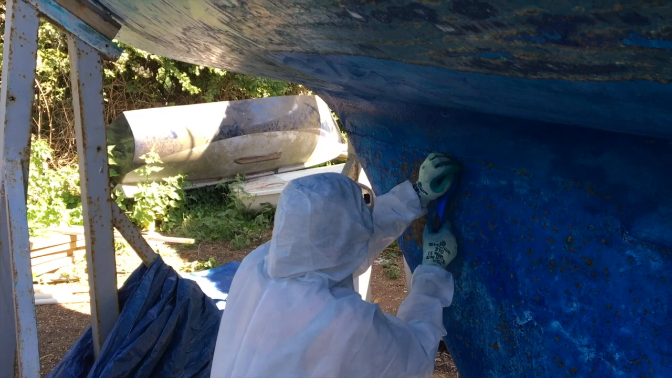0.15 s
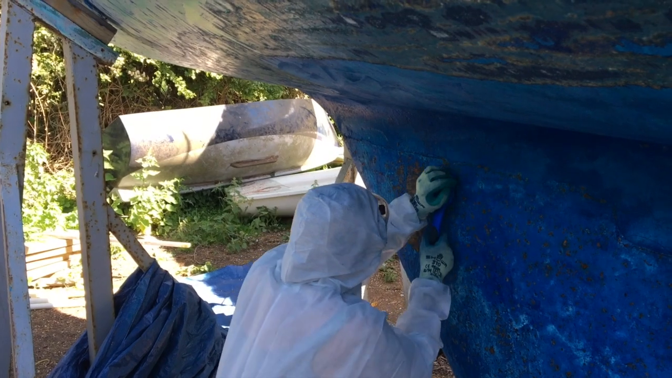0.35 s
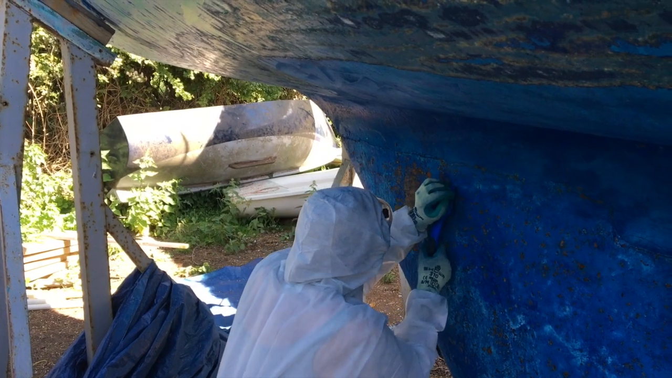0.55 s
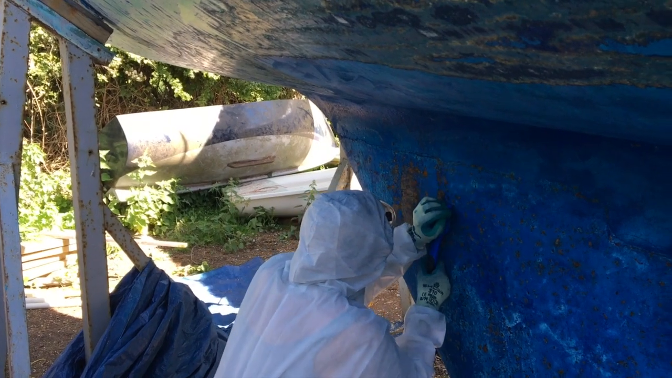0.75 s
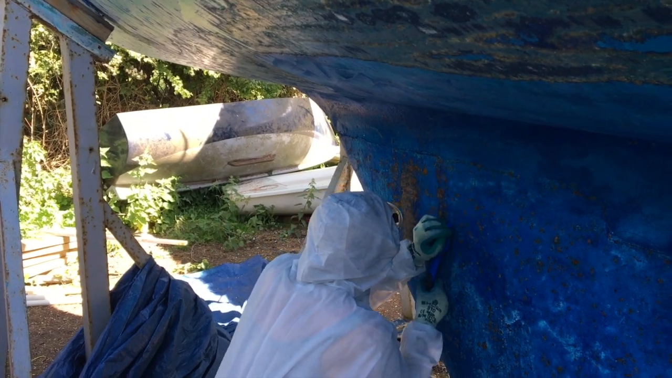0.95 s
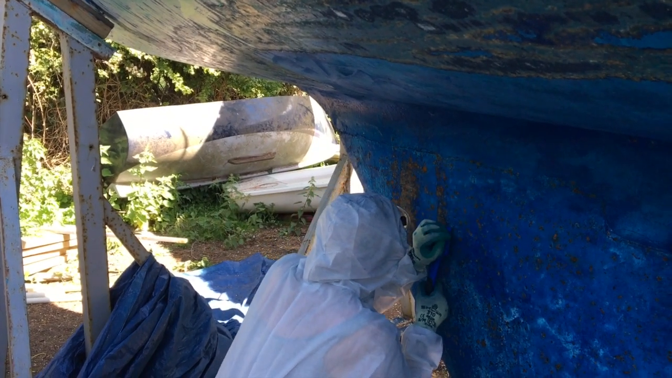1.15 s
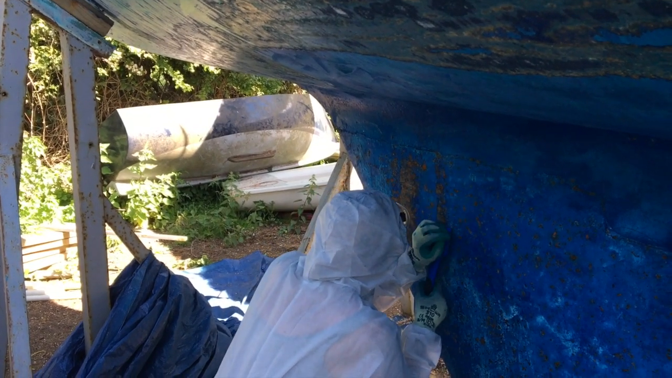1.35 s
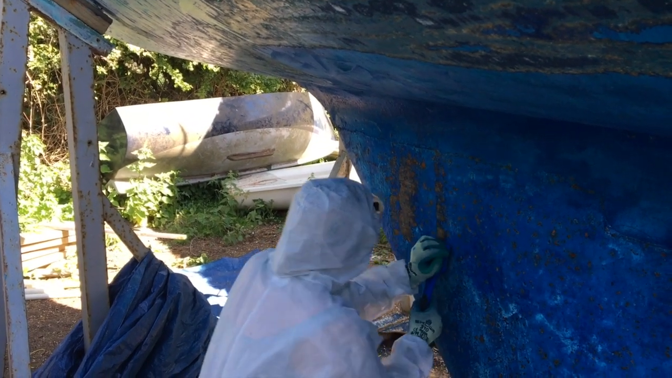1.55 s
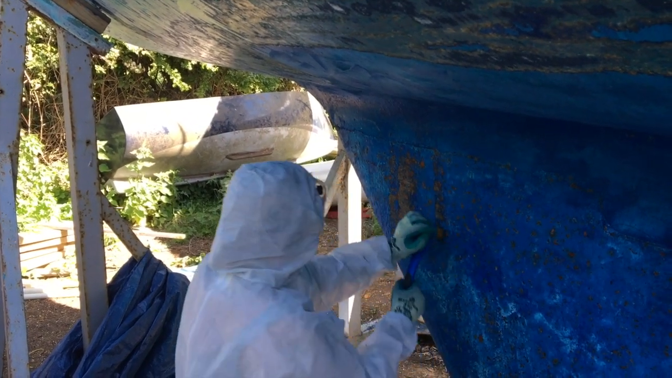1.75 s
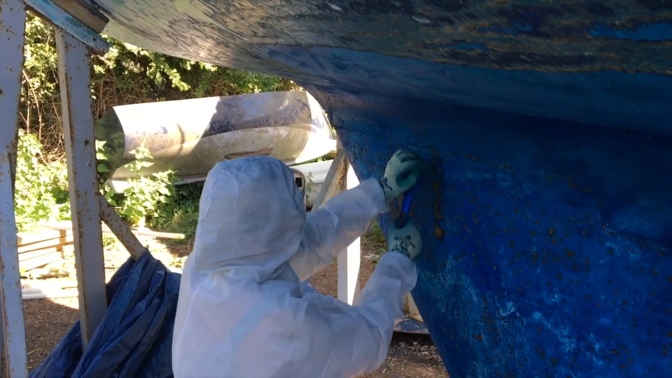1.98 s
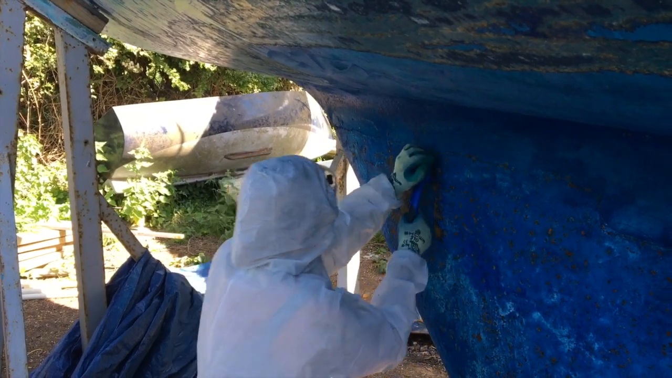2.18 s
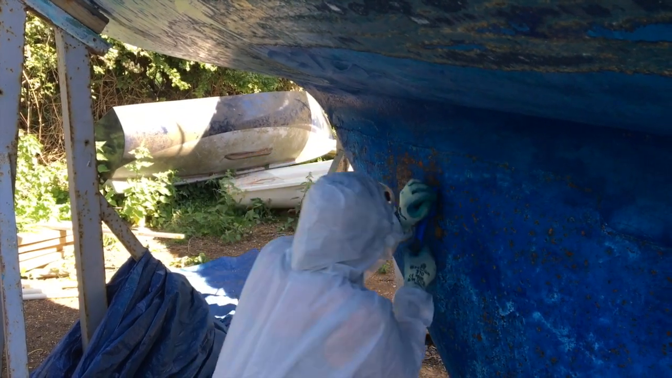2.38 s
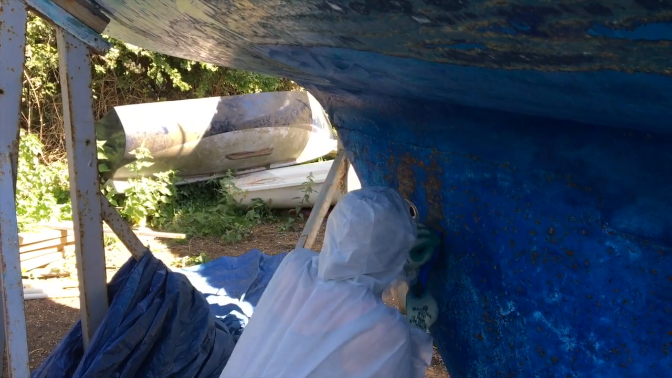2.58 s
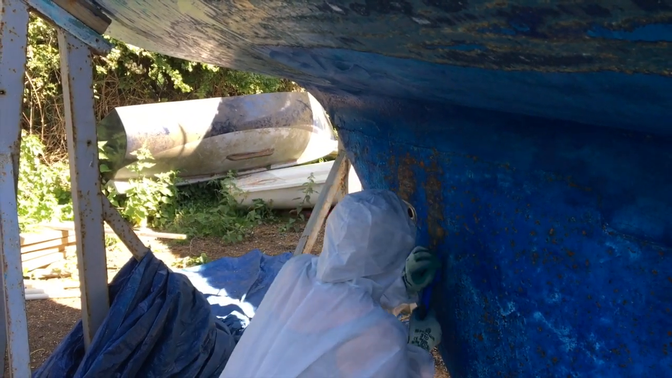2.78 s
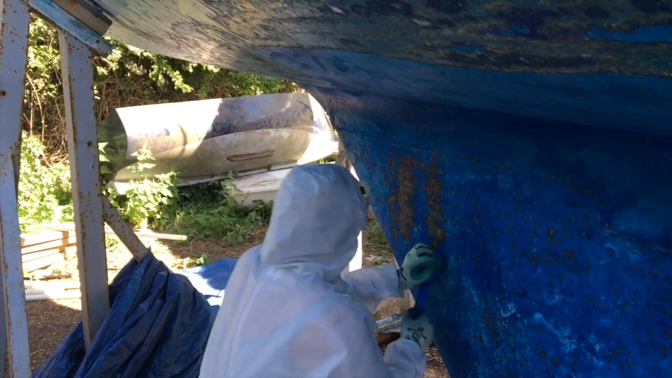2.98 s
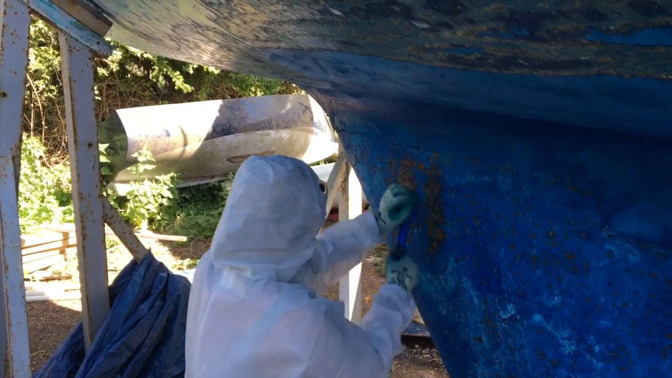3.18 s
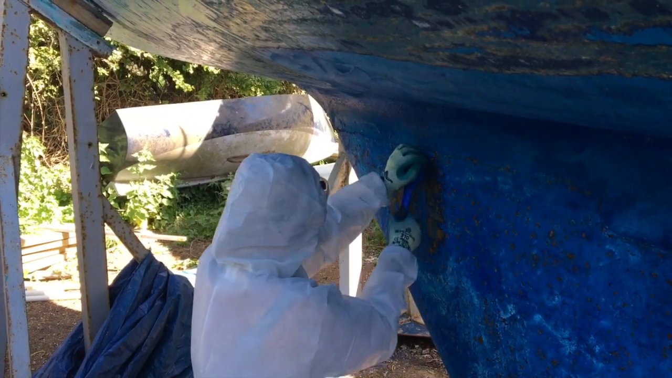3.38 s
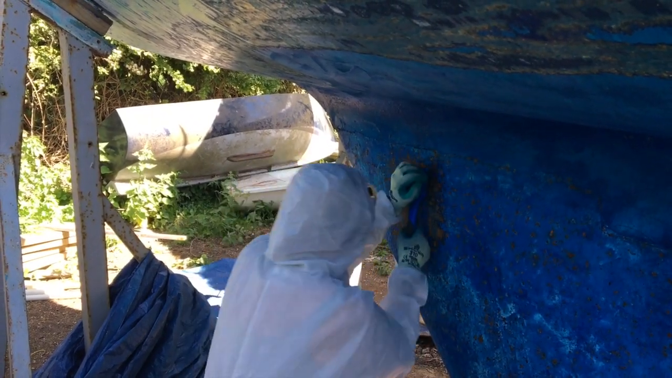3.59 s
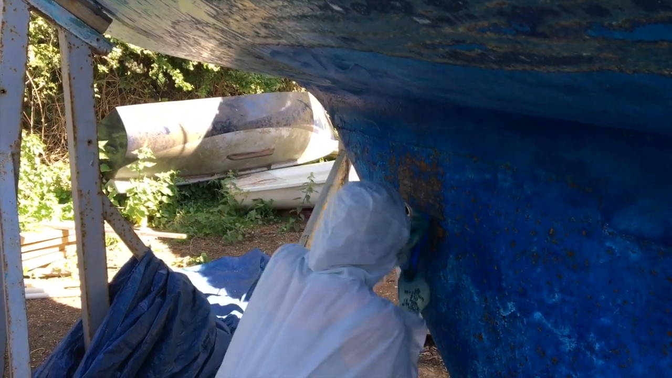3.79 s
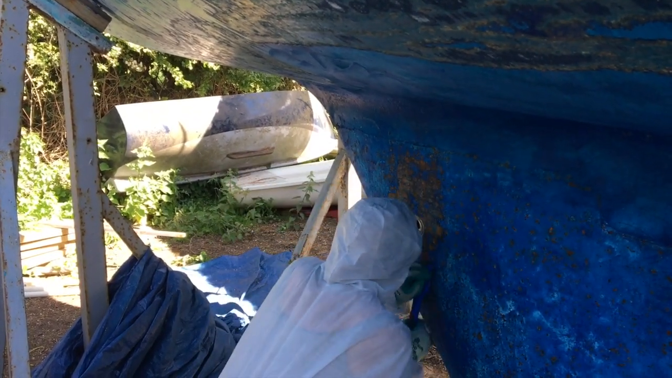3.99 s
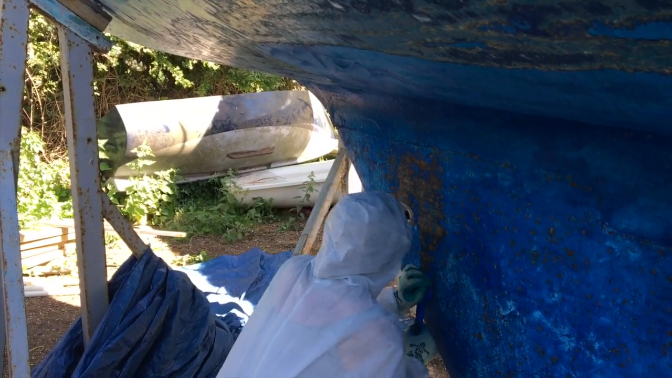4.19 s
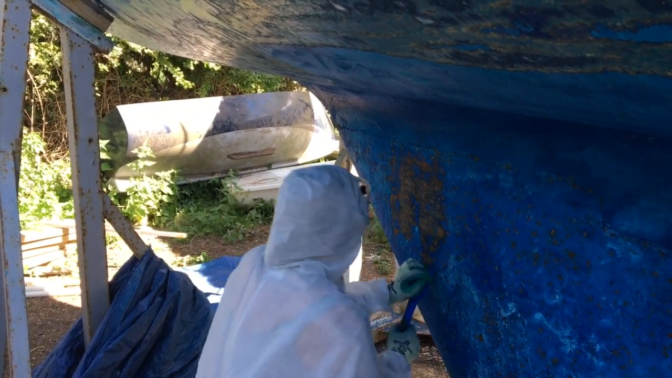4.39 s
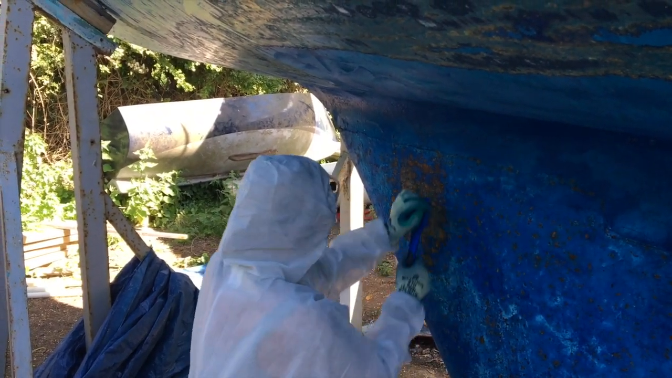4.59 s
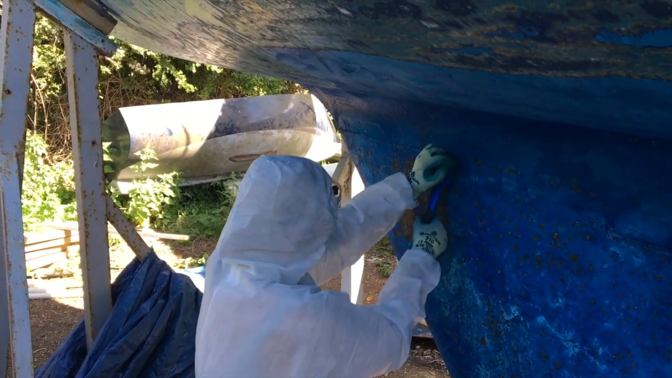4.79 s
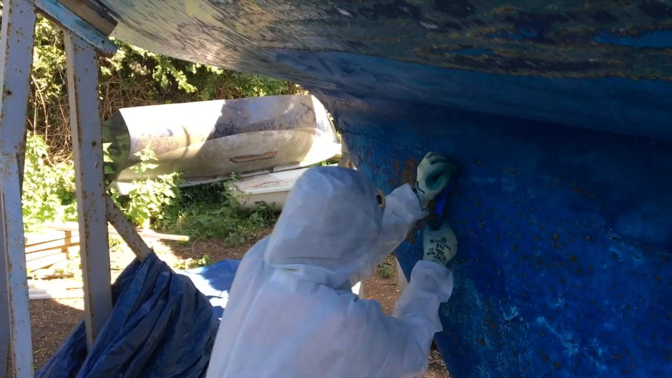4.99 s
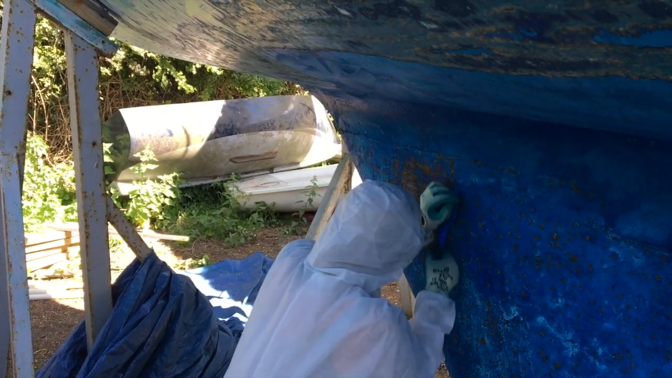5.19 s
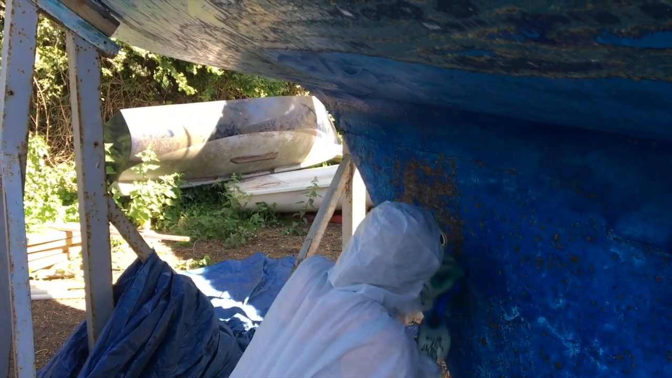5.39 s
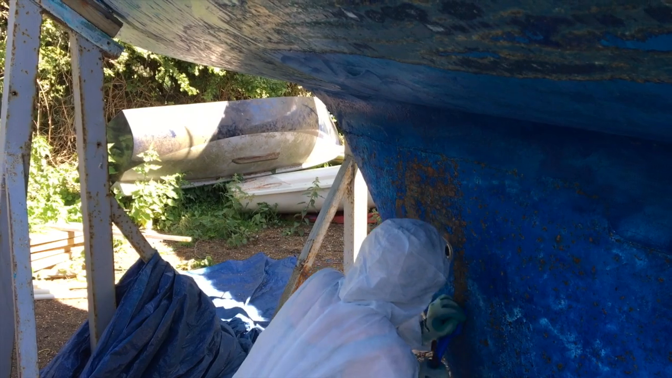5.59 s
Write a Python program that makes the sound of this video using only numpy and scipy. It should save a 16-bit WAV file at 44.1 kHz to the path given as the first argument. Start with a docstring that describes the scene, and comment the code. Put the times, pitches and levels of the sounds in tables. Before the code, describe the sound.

Close to a boat hull outdoors, a steel scraper taps and rasps in short gritty strokes, then makes longer pulls with pauses between. Sharp blade knocks mark touches and catches; stiff coverall rustle and dull body thumps fill the gaps. The final strokes come fast after a strong clack. Quiet yard wash, light wind rumble and a faint motor hum lie behind; the microphone is fairly near, with little reverberation.

```python
"""Scraping a boat hull in an open yard

A steel hand scraper rasps down the painted flank: random clicks, for tiny fractures of the paint, ring
the blade and hull skin, and each stroke swells with hand pressure. Touches and knocks ring the same modes.
Filtered noise makes the coverall's rustle, with ticks of flakes on a tarpaulin; thumps are decaying sines.
Behind lie a steady outdoor wash, lumpy wind rumble and a distant motor hum of two wavering sines."""
import sys
import numpy as np
from scipy import signal
from scipy.fft import rfft, irfft
from scipy.io import wavfile
from scipy.ndimage import uniform_filter1d

SR = 44100
rng = np.random.default_rng(int(sys.argv[2]) if len(sys.argv) > 2 else 0)


def store_wav(level_fs):
    """Save 16-bit WAV to argv[1]."""
    pcm = np.round(np.clip(np.atleast_2d(level_fs), -1, 1) * 32767)
    wavfile.write(sys.argv[1], SR, pcm.T.astype(np.int16))


N = 249165  # length in samples

# Modes of the blade and hull skin. Each row: pitch in Hz, width in Hz, relative level in dB.
BLADE_MODES = [(1216, 18, 5), (1443, 120, -17), (1654, 60, 3), (2170, 87, -12.5), (2400, 130, 7),
               (2660, 52, -11), (3560, 940, -7.5), (4155, 67, 2.5), (4450, 35, -4), (6140, 190, -12.5),
               (6550, 123, 2), (7700, 1050, -4.5), (9630, 1400, -4), (11100, 1500, -0.5),
               (12600, 770, -4.5)]


def gain_of(db):
    """Amplitude factor for a level in dB."""
    return 10 ** (np.asarray(db) / 20)


def evened(x):
    """Scales x to an rms of 1."""
    return x / np.sqrt(np.mean(x ** 2) + 1e-20)


def smoothed(x, span):
    """Two running means in a row, each span samples long."""
    return uniform_filter1d(uniform_filter1d(x, span), span)


def steadied(x):
    """Divides out the slow level, so that the stroke and bite gains set the swell."""
    return evened(x / np.sqrt(abs(smoothed(x ** 2, 2000)) + 1e-20))


def add(mix, s, sound):
    """Lays a sound into the mix from s seconds on, cut at the end."""
    part = mix[round(s * SR):][:len(sound)]
    part += sound[:len(part)]


def wander(seconds):
    """Slow random drift of rms 1 that holds for about the given time."""
    return evened(smoothed(rng.standard_normal(N), max(int(seconds * SR), 1)))


def above(x, hz):
    """High-pass run forward and backward, so that nothing is delayed."""
    return signal.sosfiltfilt(signal.butter(N=4, Wn=hz, btype="high", fs=SR, output="sos"), x)


def resonate(x, hz, width):
    """Shifts hz down to zero, smooths, and shifts back: a resonance of gain 1."""
    turn = np.exp(2j * np.pi * np.cumsum(hz * np.ones(len(x))) / SR)
    decay = np.exp(-np.pi * width / SR)
    return 2 * (turn * signal.lfilter([1 - decay], [1, -decay], x / turn)).real


def coloured(x, spectrum, patchy_db, size):
    """Gives x a spectrum, with random patches drifting in time and pitch."""
    hz, _, z = signal.stft(x, SR, nperseg=size)
    f, db = np.transpose(spectrum)
    patches = rng.standard_normal(z.shape)
    patches = evened(uniform_filter1d(uniform_filter1d(patches, 5, 0), 9, 1))
    colour_db = np.interp(np.log(hz + 1), np.log(f + 1), db)
    z = z * gain_of(colour_db[:, None] + patchy_db * patches)
    return evened(signal.istft(z, SR, nperseg=size)[1][:N])


def grains(per_s, spread_db):
    """Random clicks of either sign; a few are much larger than the rest."""
    size_db = spread_db * np.minimum(rng.exponential(1, N), 4)
    size = gain_of(size_db) * rng.choice([-1., 1.], N)
    return evened(size * (rng.random(N) < per_s / SR))


def yard():
    """Steady outdoor wash, lumpy wind rumble from resonant noise, and a wavering two-line motor hum."""
    # Colour of the open yard. Each row: frequency in Hz, relative level in dB per Hz.
    yard_colour = [(12, -38), (20, -20), (65, 3.5), (119, 7), (162, 2.5), (214, 2.5), (455, -8),
                   (913, -11.5), (1690, -15.5), (2950, -19), (6430, -23.5), (12900, -26.5), (15700, -32)]
    # Wind gusts. Each row: time of the peak in seconds, level in dB.
    gusts = [(0.04, -58), (0.49, -58), (1.55, -54), (1.99, -38), (2.15, -55), (2.55, -54), (3.02, -53),
             (4.2, -55), (4.5, -62), (5.6, -53)]
    # Course of the distant hum. Each row: time in seconds, level of the fundamental in dB.
    hum_course = [(0.0, -65), (0.33, -48.5), (0.64, -63), (1.62, -59.5), (2.1, -51), (2.5, -66), (4.2, -68),
                  (5.45, -47), (5.65, -53.5)]
    wash_db, breeze_db, octave_db = -55, -56.5, -59
    gust_s, hum_hz = 0.075, 83.4
    t = np.arange(N) / SR

    wash = gain_of(wash_db) * coloured(rng.standard_normal(N), yard_colour, 3.3, size=2048)

    rumble = evened(resonate(resonate(rng.standard_normal(N), 50, 25), 48.0, 34))
    swells = sum(gain_of(db) * np.exp(-((t - s) / gust_s) ** 2) for s, db in gusts)
    wind = rumble * (gain_of(breeze_db) + swells)

    turn = 2 * np.pi * np.cumsum(hum_hz * (1 + 0.0063 * wander(0.081))) / SR
    hum_db = np.interp(t, *np.transpose(hum_course)) + 1.3 * wander(0.026)
    hum = gain_of(hum_db) * np.sin(turn)
    hum = hum + gain_of(octave_db + 2.6 * wander(0.05)) * np.sin(2 * turn)
    return wash + wind + np.sqrt(2) * hum  # the hum levels are rms


def thumps():
    """Soft low pushes as the worker shifts weight: about one swing, and a short ring underfoot."""
    # Dull thumps. Each row: start in seconds, level in dB, pitch in Hz.
    pushes = [(1.53, -39, 45), (1.671, -34, 57.7), (1.921, -41, 110), (1.938, -28.5, 112), (1.975, -24, 98),
              (2.018, -26, 79.4), (2.086, -32, 63.7), (2.136, -32, 59.6), (3.0, -35, 59), (3.019, -36, 57),
              (3.204, -34.5, 85), (3.213, -34, 64.6), (3.247, -46, 150), (4.499, -38, 50)]
    # What rings in a thump. Each row: pitch in Hz, width in Hz, relative level in dB.
    boards = [(149.2, 9.6, 0.5), (304, 21.5, 3), (430, 43, -2), (547, 64, -6.5)]
    ring_db, ring_db_per_octave = -9.5, 21  # for a 100 Hz thump; duller thumps ring less
    rise_s = 0.00095
    out, t = np.zeros(N), np.arange(12000) / SR
    detunings = rng.uniform(0.894, 1.05, (len(pushes), len(boards)))
    for (s, db, hz), detune in zip(pushes, detunings):
        swing = np.sin(2 * np.pi * hz * t) * np.exp(-t * hz / 1.06)
        rattle = sum(gain_of(d) * np.sin(2 * np.pi * f * k * t) * np.exp(-np.pi * w * t)
                     for k, (f, w, d) in zip(detune, boards))
        rattle_gain = gain_of(ring_db + ring_db_per_octave * np.log2(hz / 100))
        add(out, s, gain_of(db) * (swing + rattle_gain * rattle) * (1 - np.exp(-t / rise_s)))
    return out


def rustle():
    """Smooth hiss of stiff cloth with sparse ticks of landing flakes."""
    # Course of the rustle. Each row: time in seconds, level in dB.
    course = [(0.0, -55.5), (0.12, -57), (0.28, -63), (0.5, -70), (0.78, -55.5), (1.09, -50), (1.3, -43.5),
              (1.49, -43.5), (1.65, -47), (1.83, -42), (2.1, -53.5), (2.14, -53), (2.77, -50),
              (2.912, -42.5), (3.226, -43.5), (3.4, -53), (4.106, -49.5), (4.208, -41), (4.76, -53),
              (4.84, -53.5), (4.99, -66), (5.65, -49.5)]
    # Colour of cloth and flakes. Each row: frequency in Hz, relative level in dB per Hz.
    cloth = [(240, -7), (400, -8), (674, -9), (975, -10), (1140, -11), (1690, -1.5), (2450, -4),
             (3430, -4.5), (9610, -10.5), (15700, -18)]
    hiss = rng.standard_normal(N) * gain_of(1.7 * wander(0.014))
    ticks = gain_of(-8.5) * grains(500, 5.9)
    level_db = np.interp(np.arange(N) / SR, *np.transpose(course))
    return coloured(hiss + ticks, cloth, 1.0, size=256) * gain_of(level_db)


def taps():
    """A sharp blow gives a broad click and rings the blade modes, most those near its centre."""
    # The blade touches, catches or knocks. Each row: start in seconds, level in dB,
    # centre of the click in Hz, spread over the modes in octaves.
    knocks = [(0.122, -27, 6360, 0.74), (0.286, -23.5, 2440, 0.72), (0.532, -33, 2540, 1.1),
              (0.5682, -22, 4000, 0.48), (0.6583, -35, 1890, .9), (0.833, -30.5, 2000, 0.24),
              (0.931, -23, 1500, 0.24), (1.1441, -27.5, 2930, 0.51), (1.359, -39, 2190, 1.3),
              (1.3962, -17, 4700, .9), (1.5648, -24.5, 3230, 0.76), (1.7, -31, 1780, 0.53),
              (1.7487, -32.5, 1770, 0.36), (1.8099, -21, 2960, .95), (1.8454, -21.5, 5800, 1.1),
              (1.9713, -33.5, 1500, 0.47), (2.11, -20, 2170, 1.3), (2.1151, -26.5, 2210, .6),
              (2.1797, -35, 2160, 0.58), (2.196, -35, 2170, .74), (3.2118, -28, 1800, 1.3),
              (3.337, -29.5, 2600, 0.93), (3.414, -19, 2030, 0.41), (3.4874, -34, 2020, .9),
              (3.5166, -32, 2250, 1.1), (4.616, -32, 2660, .9), (4.655, -34, 1910, 1.3),
              (4.802, -25.5, 1750, .52), (4.8743, -33, 2000, 1.2), (4.9426, -23, 2260, 0.69),
              (5.0331, -28.5, 4300, 0.93), (5.089, -27.5, 1740, 1.3), (5.1503, -17, 4060, .9),
              (5.2116, -13, 2416, .98)]
    out, t = np.zeros(N), np.arange(4000) / SR
    for s, db, hz, octaves in knocks:
        noise = rng.standard_normal(len(t)) * gain_of(-60 * t / 0.014)  # falls 60 dB in 14 ms
        blow = (t == 0) * 4.75 + noise
        width = hz * octaves
        click = resonate(resonate(blow, hz, width), hz, 2 * width)
        modes = 0
        for f, w, mode_db in BLADE_MODES:
            near = np.exp(-.5 * (np.log2(f / hz) / octaves) ** 2)
            modes = modes + near * gain_of(mode_db) * resonate(blow, f, w + 60) * np.sqrt(f / w)
        sound = click / abs(click).max() + gain_of(-7) * modes / abs(modes).max()
        add(out, s, gain_of(db) * sound / abs(sound).max())
    # the thin blade radiates no bass
    return signal.sosfilt(signal.butter(N=4, Wn=900, btype="high", fs=SR, output="sos"), out)


def stroke(touch_s, touch_db, full_s, full_db, lift_s, lift_db, fastest_s, growl_db, sizzle_db):
    """Gains of body, growl and sizzle: the edge rests, the hand leans in, pulls down, lets go."""
    press_db_per_s, release_db_per_s, touch_rise_s = 261, 803, 0.0012
    growl_ends_db, sizzle_ends_db = -3.5, -3.5  # both fall off toward the slow ends of a stroke
    t = np.arange(N) / SR
    lean_db = np.maximum(touch_db, full_db - press_db_per_s * (full_s - t))
    pull_db = np.interp(t, [full_s, lift_s], [full_db, lift_db])
    pull_db = pull_db - release_db_per_s * np.maximum(t - lift_s, 0)
    contact = np.clip((t - touch_s) / touch_rise_s, 0, 1)
    level = contact * gain_of(np.where(t < full_s, lean_db, pull_db))
    slow = abs(np.interp(t, [touch_s, fastest_s, lift_s], [-1, 0, 1]))
    return level * gain_of([0 * t, growl_db + growl_ends_db * slow, sizzle_db + sizzle_ends_db * slow])


def bite():
    """Gain that jumps as the edge bites into thicker paint, and sinks back."""
    # Sudden surges. Each row: start in seconds, surge in dB, fading time in seconds.
    bites = [(0.344, 2.5, .02), (.374, 5.5, 0.0085), (.409, 8.5, 0.014), (.567, 10, 0.006),
             (.595, 2.5, .02), (.657, 7.5, 0.06), (.928, 6, 0.028), (1.395, 0.5, 0.026), (2.18, 4, 0.019),
             (2.268, 9, 0.02), (2.32, 2.5, 0.016), (2.54, 3.5, 0.028), (2.634, 5.5, 0.023), (3.6, 5, 0.038),
             (3.696, 6, 0.016), (3.821, 4, 0.021), (3.97, 3, 0.093), (4.943, 17, 0.0098),
             (5.148, 7.5, 0.023), (5.198, 8.5, 0.021), (5.42, 3.5, 0.12), (5.565, 1, .02)]
    t = np.arange(N) / SR
    return gain_of(sum(db * (t >= s) * np.exp(-np.maximum(t - s, 0) / fading) for s, db, fading in bites))


def scraper():
    """Fractures come in clumps as the edge judders; each mode flares on its own and drifts with the grip."""
    # Strokes of the hand. Each row: edge touches in seconds, level in dB while it rests lightly,
    # full pressure in seconds, level in dB, edge lifts in seconds, level in dB, hand fastest in seconds,
    # then hull growl and treble sizzle at the fastest, both in dB against the level at that moment.
    strokes = [(.121, -50, 0.11, -48, 0.13, -52.5, .125, -25, 3),
               (.158, -50, .163, -50.5, .17, -53, .162, -14, 2),
               (0.285, -44, .34, -35.5, 0.45, -43.5, .345, -6, 3.5),
               (0.53, -43.5, 0.66, -38, 0.74, -47, 0.67, -7, 0.5),
               (.858, -42, .93, -35.5, 1.08, -44, .95, -5.5, 1.5),
               (1.354, -42.5, 1.412, -32, 1.498, -44, 1.405, -7.5, 3.5),
               (2.175, -45, 2.32, -33.5, 2.728, -37.5, 2.57, -6.5, 1.5),
               (3.512, -46, 3.612, -35, 4.05, -34, 3.76, -9.5, 2),
               (4.87, -51, 4.928, -40.5, 4.99, -45, 4.945, -12, -2),
               (5.088, -37.5, 5.26, -33.5, 5.36, -38, 5.2, -5.5, 3),
               (5.3, -36.5, 5.33, -29.5, 5.598, -37, 5.4, -8.5, 2.5),
               (5.629, -48, 6.6, -41.5, 5.63, -42, 5.61, 1, 2)]
    # Broad colour of the fractures. Each row: frequency in Hz, relative level in dB per Hz.
    fracture_colour = [(290, -31), (500, -29.5), (900, -23.5), (1370, -10), (1520, -10), (1630, -7),
                       (2370, -2), (3260, -9.5), (4110, -6.5), (7210, -9), (12800, -5.5), (15700, -9.5)]
    growl_below_hz, sizzle_above_hz = 1500, 5500
    cracks = grains(8000, 2.0) * gain_of(2.0 * wander(0.0012) + 0.51 * wander(0.013))
    ring = 0
    for hz, width, db in BLADE_MODES:
        flare_db = 2.6 * wander(0.0043) + 2.6 * wander(0.062)
        drifting_hz = hz * (1 + 0.021 * wander(0.098))
        mode = evened(resonate(cracks, drifting_hz, width))
        ring = ring + gain_of(db + flare_db) * np.sqrt(width) * mode
    rasp = coloured(cracks, fracture_colour, 2.44, size=256) + gain_of(-0.5) * evened(above(ring, 1610))

    upper, sizzle = above(rasp, growl_below_hz), above(rasp, sizzle_above_hz)
    body, growl = upper - sizzle, rasp - upper
    gains = sum(stroke(*row) for row in strokes)
    return bite() * (gains * [steadied(body), steadied(growl), steadied(sizzle)]).sum(0)


def under_hull(x):
    """Short sparse reflections between hull and ground, dying within a few dozen ms."""
    delays = np.arange(60, 6000, 20) + rng.integers(0, 20, 297)  # in samples
    tail = np.zeros(6100)
    tail[delays] = rng.choice([-1., 1.], len(delays)) * gain_of(-60 * delays / SR / 0.062)
    return signal.oaconvolve(x, tail / np.linalg.norm(tail))[:N]


def scene():
    """The tool and its reflections under the hull, with the worker and the yard around it."""
    tool = scraper() + taps()
    return (tool + gain_of(-6) * under_hull(tool) + rustle() + thumps() + yard())[None]


def record(dry):
    """The microphone housing cuts a few dips and the capsule loses the deepest bass; then the band limit."""
    # Dips in the microphone colour. Each row: centre in Hz, width in Hz, share removed.
    dips = [(2930, 1260, 0.3), (7390, 500, 0.33), (10450, 530, 0.43), (13600, 360, 0.14)]
    edge_hz = 15780
    hz = np.fft.rfftfreq(N, 1 / SR)
    colour = hz ** 2 / (hz ** 2 + 30 ** 2)  # the bass loss
    for f, width, share in dips:
        colour = colour * (1 - share / (1 + ((hz - f) / (width / 2)) ** 2))
    heard = irfft(rfft(dry) * colour, N)
    band_limit = signal.firwin(801, edge_hz, window=("kaiser", 9), fs=SR)
    return signal.oaconvolve(heard, band_limit[None], "same")


dry = scene()
out = record(dry)
store_wav(out)
```